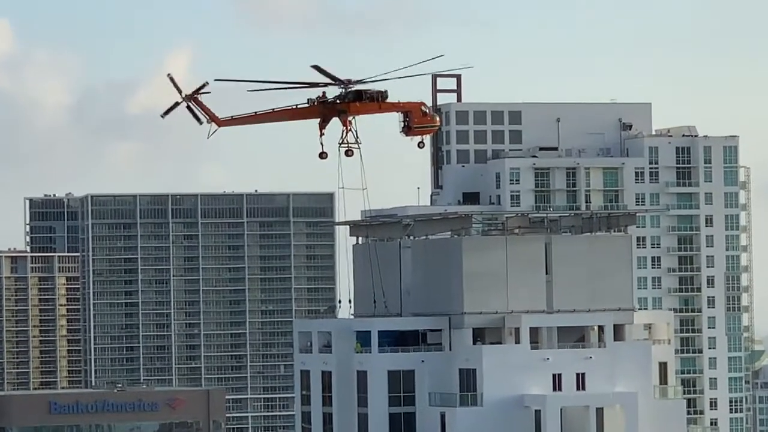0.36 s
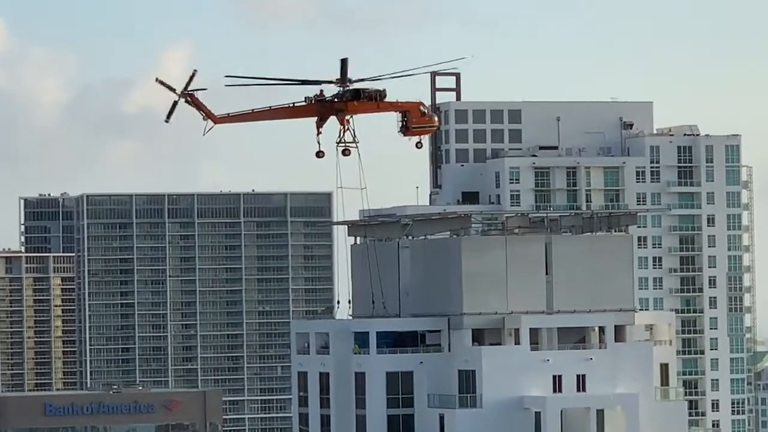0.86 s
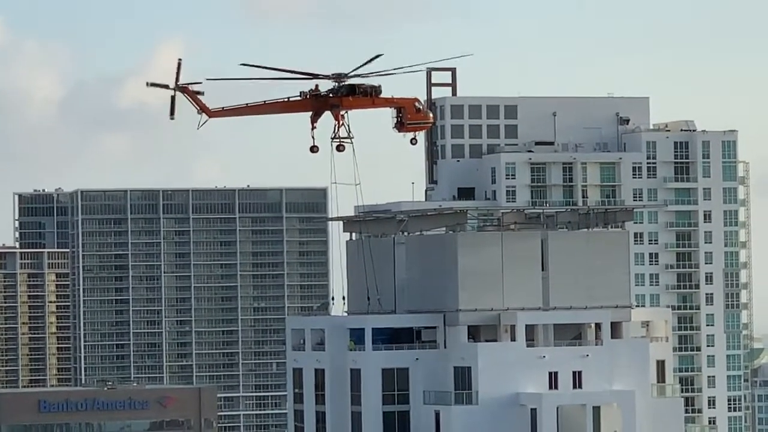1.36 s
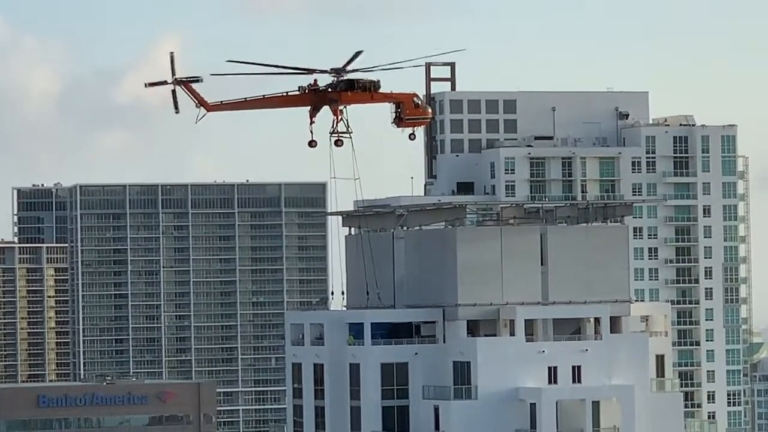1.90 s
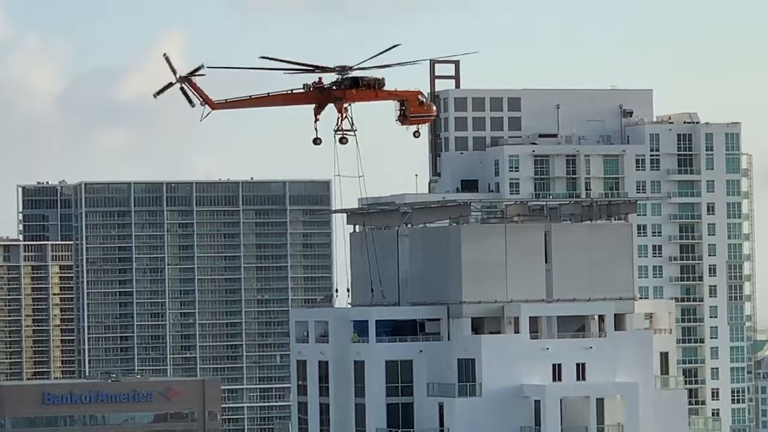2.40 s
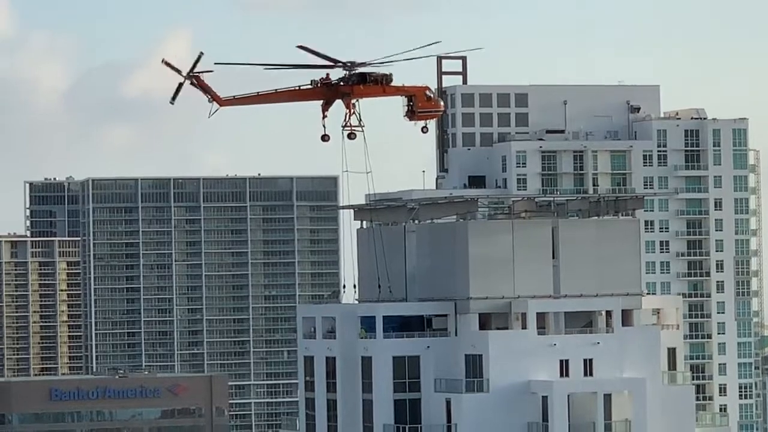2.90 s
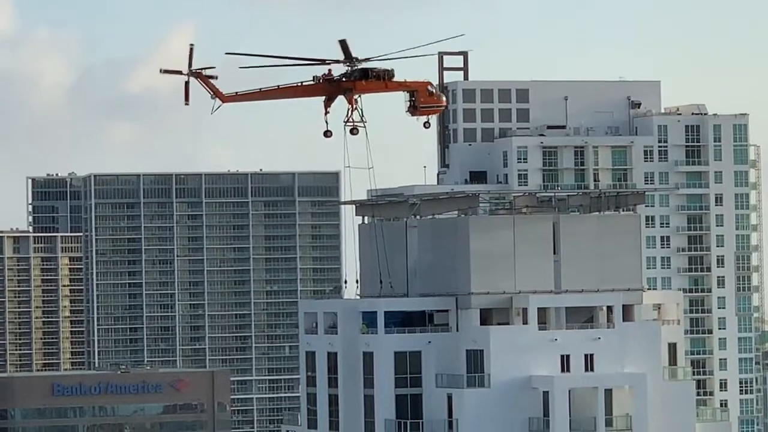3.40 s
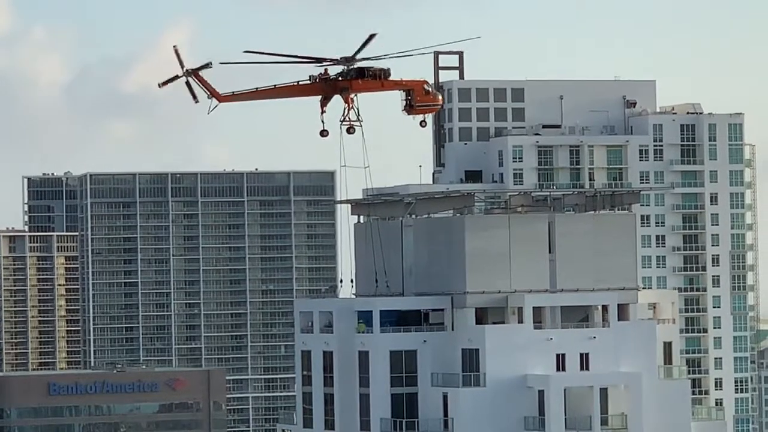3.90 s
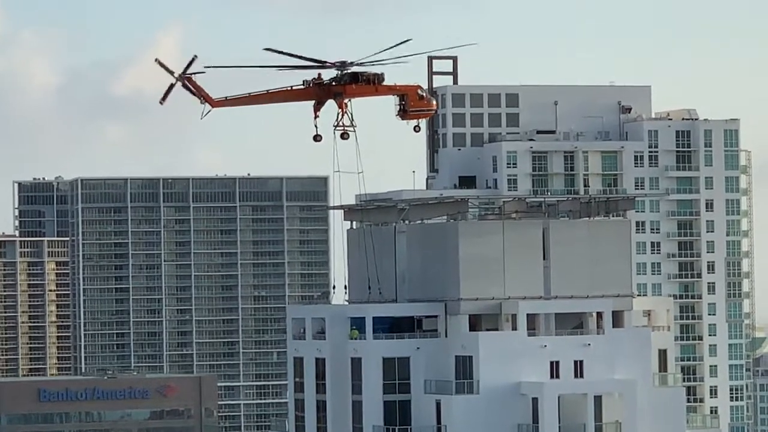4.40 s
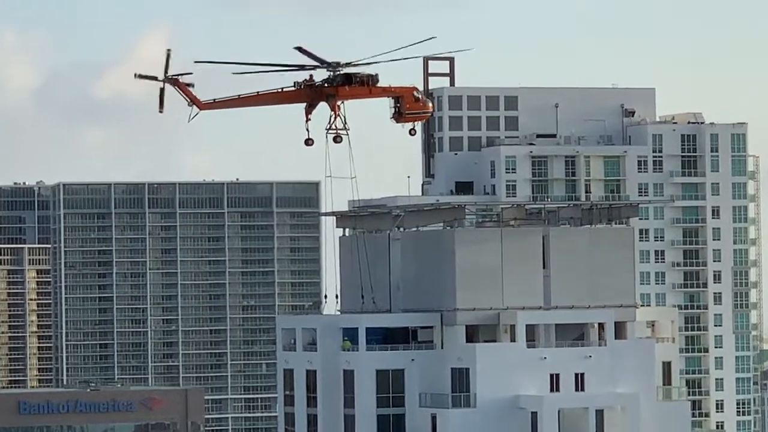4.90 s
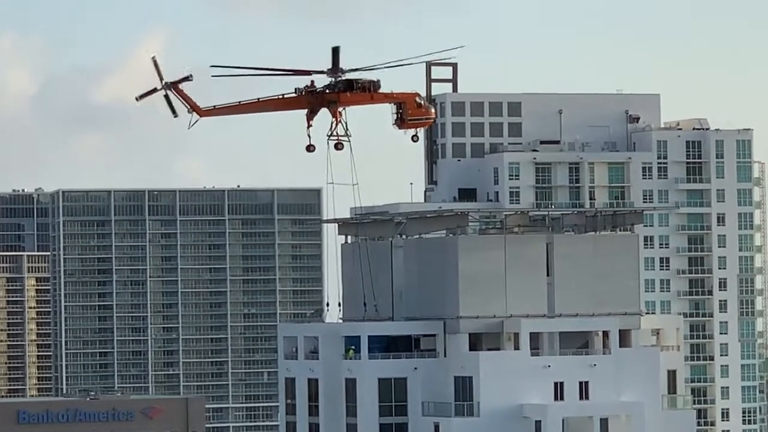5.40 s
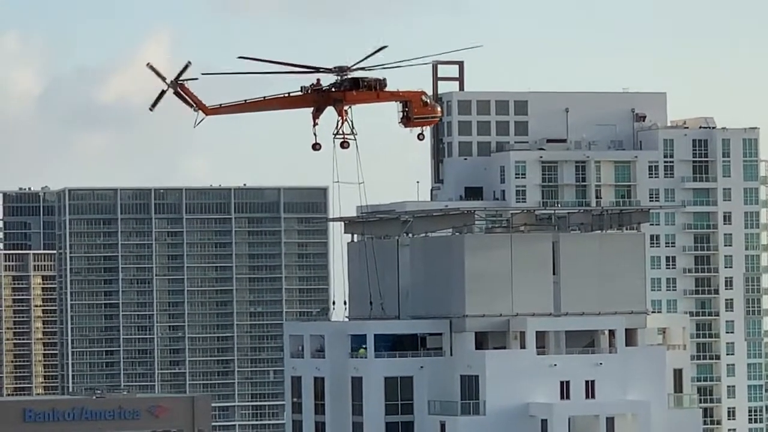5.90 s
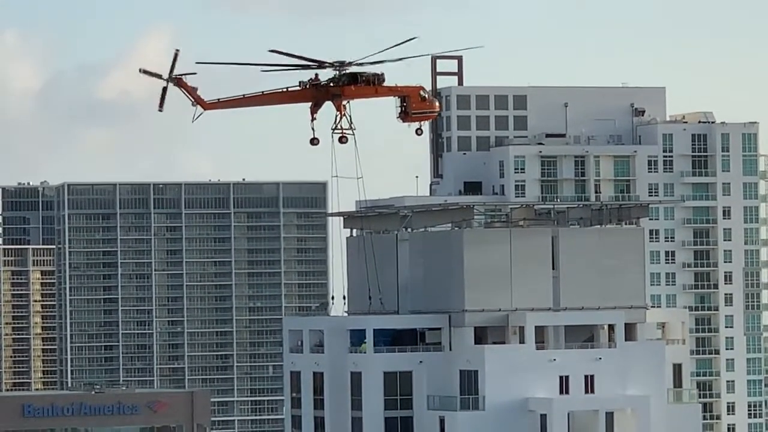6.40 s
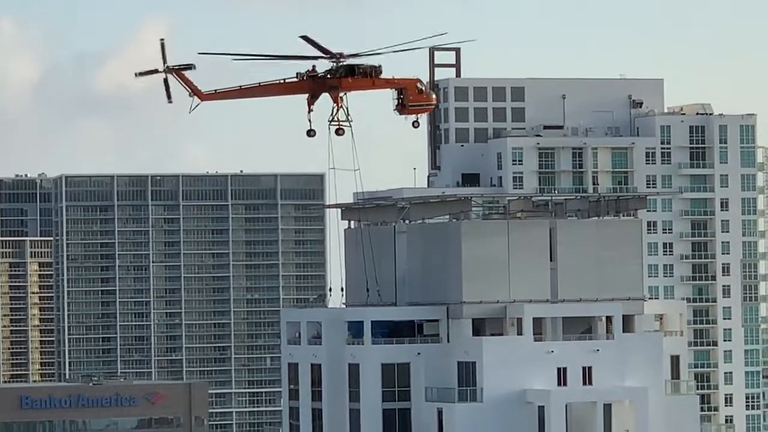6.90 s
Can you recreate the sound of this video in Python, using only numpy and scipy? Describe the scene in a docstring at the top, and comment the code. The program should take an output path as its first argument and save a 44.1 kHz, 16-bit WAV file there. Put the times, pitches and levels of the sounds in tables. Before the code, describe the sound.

Continuous deep rotor roar and rapid blade slaps from a big hovering helicopter, sharper cracks early on, thin wavering engine whine above.

```python
"""Heavy helicopter from a city balcony

It hovers a few hundred metres off over the roofs; two close microphones, a wall behind them returning treble.
Each main blade pass, about 18 a second, pushes a low ring and sheds eddies that hiss; tips slap, dull and bright.
Shaped noise makes the broad rotor wash and turbine exhaust, swelling and fluttering in moving air.
Wavering sines give the rotor hum, the singing gearbox and the compressor whine; narrow noise whistles faintly."""
import sys
import numpy as np
from scipy import signal
from scipy.fft import rfft, irfft
from scipy.io import wavfile
from scipy.ndimage import uniform_filter1d, minimum_filter1d

SR = 44100
rng = np.random.default_rng(int(sys.argv[2]) if len(sys.argv) > 2 else 0)


def generate_wav(sig):
    """Save sig (samples, or channels by samples) to the path in sys.argv[1] as 16-bit PCM at SR."""
    pcm = np.round(np.clip(np.atleast_2d(sig).T, -1, 1) * 32767).astype(np.int16)
    wavfile.write(sys.argv[1], SR, pcm)


def gain_from_decibels(decibels):
    """Convert decibel values to linear amplitude factors."""
    exponent = np.asarray(decibels, float) / 20
    return 10 ** exponent


N = 309582
TIME = np.arange(N) / SR
HZ = np.maximum(np.arange(N // 2 + 1) * SR / N, 1)
BLADE_HZ = 18.536   # main blade passes a second, before the slip

# how clearly the air carries the upper range, and how hard the tips hiss in the wake ahead:
# t/s, clearness/dB, hiss level/dB
UPPER_RANGE = [(0, 4, -30.5), (.45, 2, -30.5), (.7, 2, -30.5), (.9, 0.5, -23.5), (1.1, 4.5, -25.5),
               (1.3, 2.5, -29.5), (1.65, 1, -26.5), (1.95, 3, -35.5), (2.35, 3, -25), (2.6, 2, -29.5),
               (2.95, 2.5, -33), (3.4, -0.5, -28), (3.8, -1.5, -34.5), (4.3, -0.5, -29.5),
               (4.9, -1.5, -38.5), (5.3, -1, -47.5), (6.1, 2, -42), (6.5, 2, -43), (7.02, -0.5, -31)]
# low ring of the blade passes: t/s, slow thump level/dB, quick beat level/dB
LOW_RING = [(0, -17, -20), (.3, -17, -22.5), (1.0, -22.5, -23), (1.3, -18.5, -20), (1.6, -15, -24.5),
            (1.8, -18, -21.5), (2.0, -29.5, -23.5), (2.15, -15.5, -23), (2.4, -17.5, -20.5),
            (2.9, -16.5, -25), (3.3, -25.5, -21.5), (3.65, -27, -27.5), (4.3, -15, -23), (4.75, -25, -26),
            (5.2, -21.5, -31), (5.9, -29.5, -22.5), (6.6, -36, -23.5), (7.02, -33.5, -22)]


def rms_one(x):
    """Scale to rms 1."""
    return x / np.sqrt(np.mean(x ** 2) + 1e-20)


def in_time(rows):
    """Columns of a time table, one value a sample."""
    s, *columns = np.transpose(rows)
    return [np.interp(TIME, s, column) for column in columns]


def at_hz(points, hz):
    """Read a spectrum on a log-frequency axis."""
    point_hz, value = np.transpose(points)
    return np.interp(np.log(hz), np.log(point_hz), value)


def drift(rate_hz):
    """Slow chance with spread 1: noise through two equal poles, drawn every 40 samples."""
    r = np.exp(-80 * np.pi * rate_hz / SR)
    noise = rng.standard_normal(N // 40 + 2002)
    slow = signal.lfilter([1], [1, -2 * r, r * r], noise)[2000:]
    return np.interp(np.arange(N) / 40, np.arange(len(slow)), rms_one(slow - slow.mean()))


def colour(x, spectrum):
    """Give x a spectrum; rms 1."""
    return rms_one(irfft(rfft(x) * gain_from_decibels(at_hz(spectrum, HZ)), N))


def resonance(x, hz, width_hz):
    """Two-pole resonance with gain 1 on top."""
    r = np.exp(-np.pi * width_hz / SR)
    poles = [1, -2 * r * np.cos(2 * np.pi * hz / SR), r * r]
    return signal.lfilter([(1 - r * r) / 2, 0, (r * r - 1) / 2], poles, x + 1e-18)


def twice_resonant(x, hz, width_hz):
    """The same resonance applied twice, so that a ring swells and dies."""
    return resonance(resonance(x, hz, width_hz), hz, width_hz)


def spike_band(x, edges_hz):
    """Band-pass scaled so that a unit spike keeps a peak of 1."""
    sos = signal.butter(4, edges_hz, "band", fs=SR, output="sos")
    peak = np.abs(signal.sosfilt(sos, signal.unit_impulse(500))).max()
    return signal.sosfilt(sos, x) / peak


def bursts(at, level_db, width_s):
    """A bell-shaped envelope at each sample index."""
    marks = np.zeros(N)
    marks[at] = gain_from_decibels(level_db)
    bell = np.exp(-.5 * (np.linspace(-.03, .03, 2647) / width_s) ** 2)
    return signal.fftconvolve(marks, bell, "same")


def rotor_turns():
    """Blade passes counted up to each sample; the rotor speed wanders, so they slip against an even beat."""
    # t/s, share of a pass late
    slip = [(0, .54), (.5, .6), (.75, .68), (1.0, .73), (2.0, .77), (3.5, .81), (4.4, .765), (5.5, .75),
            (6.2, .72), (7.02, .77)]
    return BLADE_HZ * TIME - in_time(slip)[0]


def pass_samples(jitter_s):
    """Sample index of each blade pass, scattered by chance."""
    passes = int(N / SR * BLADE_HZ)
    at = np.interp(np.arange(passes), rotor_turns(), np.arange(N))
    at = at + jitter_s * SR * rng.standard_normal(passes)
    return np.clip(at.astype(int), 0, N - 1)


def roar(patchy_db, surge_db, flutter_db, throb_db):
    """Wash and exhaust noise; moving air makes each half octave swell and flutter."""
    # spectra of rotor wash and turbine exhaust: f/Hz, relative level/dB per Hz
    wash = [(11, -40.5), (18, -36), (43, -10.5), (140, -9.5), (193, -1), (292, -8), (368, -7), (485, -16),
            (591, -15.5), (669, -27.5), (700, -23.5), (910, -55), (1540, -120)]
    exhaust = [(380, -33.5), (650, -0.5), (730, 0.5), (1280, -8), (1390, -7.5), (1900, -9.5), (2160, -16.5),
               (2570, -14.5), (3300, -17.5), (4350, -21.5), (4650, -25.5), (5050, -20), (5380, -29.5),
               (5560, -21.5), (6100, -25), (7020, -31.5), (8360, -35), (9850, -39.5), (10600, -53.5),
               (13700, -80), (22000, -120)]
    # centres of rumble, drone, body, middle and treble: f/Hz
    air_hz = [70, 195, 350, 1000, 3500]
    # swell of the lowest wash: t/s, level/dB
    rumble = [(0, 0.5), (.8, -1), (2, -1.5), (3.4, -2.5), (4.2, -1), (5, -0.5), (5.7, 0.5), (6.3, 3),
              (7.02, 4)]
    both = 0
    for spectrum, level_db in [(wash, -16), (exhaust, -27.5)]:   # rms before the swells
        shape_db = at_hz(spectrum, HZ)
        white = rfft(rng.standard_normal((2, N)))
        both = both + gain_from_decibels(level_db) * white * gain_from_decibels(shape_db) / np.sqrt(np.mean(gain_from_decibels(2 * shape_db)))

    thump_db, beat_db = in_time(LOW_RING)
    clear_db = in_time(UPPER_RANGE)[0]
    # drone, body and middle follow thump, beat and clearness in part
    swell = np.array([in_time(rumble)[0], 0.071 * thump_db, 0.045 * beat_db, 0.68 * clear_db, clear_db])
    swell -= swell.mean(axis=1, keepdims=True)
    throb = np.cos(2 * np.pi * (rotor_turns() - .12))   # the wash rises just behind each blade
    together = drift(3.2)
    out = 0
    for octave in np.arange(4, 14, .5):   # log2 of the centre in Hz
        band = np.cos(np.pi * np.clip(np.log2(HZ) - octave, -.5, .5)) ** 2
        shares = [np.interp(octave, np.log2(air_hz), column) for column in np.eye(len(swell))]
        gain_db = shares @ swell
        gain_db += throb_db * throb * np.clip(octave - 6, 0, 1)   # none up to 64 Hz, full from 128 Hz
        gain_db += patchy_db * drift(0.39) + surge_db * drift(5.0)
        gain_db += flutter_db * (0.12 * together + drift(31))
        out = out + gain_from_decibels(gain_db) * irfft(both * band, N)
    return out


def tone(hz, level_db, waver_hz, clean):
    """A sine whose strength and phase waver about a steady part as the air scatters it."""
    turn = np.exp(2j * np.pi * (np.cumsum(hz + 0 * TIME) / SR + rng.random()))
    rows = [turn * (clean + drift(waver_hz) + 1j * drift(waver_hz)) for arrival in range(2)]
    return gain_from_decibels(level_db) * rms_one(np.real(rows))


def rotor_hum():
    """Low tones of the main and tail rotors, each a slowly wavering sine."""
    # f/Hz, level/dB
    hum = [(18.52, -60.5), (37.04, -60), (56.55, -38), (113.2, -36), (169.8, -31.5), (226.3, -46),
           (283, -35.5)]
    return sum(tone(hz, db, waver_hz=.7, clean=3.0) for hz, db in hum)


def compressor_whine():
    """The compressor's gliding sine flickers and throbs with the blades."""
    # pitch: t/s, f/Hz
    pitch = [(0, 5640), (.5, 5670), (.9, 5705), (1.5, 5725), (2.3, 5752), (4.3, 5742), (6.1, 5715),
             (7.02, 5725)]
    # level before flicker and throb: t/s, level/dB
    whine_level = [(0, -39.5), (.1, -55), (.35, -43), (.55, -56), (.7, -53), (.85, -43.5), (1.0, -57),
                   (1.1, -42), (1.17, -49), (1.25, -42.5), (1.45, -46.5), (1.7, -49.5), (2.0, -47),
                   (2.3, -44), (2.7, -45.5), (3.1, -45), (3.5, -51), (3.75, -47), (4.0, -45.5),
                   (4.15, -39.5), (4.3, -47), (4.43, -40.5), (4.6, -50.5), (5.0, -45.5), (5.45, -44),
                   (5.9, -52), (6.15, -42.5), (6.3, -43), (6.55, -42), (6.8, -48), (7.02, -44)]
    whine = tone(in_time(pitch)[0], in_time(whine_level)[0], waver_hz=28, clean=1.2)
    flicker_db = 1.5 * drift(11)
    throb_db = 1.5 * np.cos(2 * np.pi * rotor_turns())
    return whine * gain_from_decibels(flicker_db + throb_db)


def gear_mesh():
    """Meshing teeth sing a slowly gliding sine and its third harmonic."""
    # pitch at the start and at the end: f/Hz
    glide = [1352, 1358.5]
    # level of the fundamental: t/s, level/dB
    gear_level = [(.4, -48), (.6, -32.5), (1.0, -36.5), (1.45, -33), (1.6, -44), (2.0, -50), (2.3, -38),
                  (2.7, -37), (3.1, -41.5), (3.4, -57), (4.5, -42.5), (5.2, -39), (5.5, -44.5), (6.4, -41),
                  (6.8, -50), (7.02, -40)]
    gear_hz = np.linspace(*glide, N)
    third_db = -55 + 0.87 * in_time(UPPER_RANGE)[0]   # rises with the clearness
    low = tone(gear_hz, in_time(gear_level)[0], waver_hz=2.9, clean=1.7)
    return low + tone(3 * gear_hz, third_db, waver_hz=12, clean=0.45)


def engine_whistles():
    """Weaker engine whistles: narrow bands of noise that drift in level."""
    # f/Hz, width/Hz of each of two resonances, level/dB before the drift
    faint = [(5470, 58, -61.5), (5800, 300, -55), (6470, 60, -65), (6040, 250, -61.5), (8200, 40, -71.5),
             (718, 55, -41.5), (1917, 89, -43.5), (4200, 300, -51)]
    out = 0
    for hz, width_hz, db in faint:
        whistle = rms_one(twice_resonant(rng.standard_normal((2, N)), hz, width_hz))
        out = out + gain_from_decibels(db + 2.7 * drift(3.0)) * whistle
    return out


def bright_edges(scatter_s):
    """Bright edges of the blade-tip slaps, most heard together with a dull crack; a small tick near every pass."""
    # strong edges: t/s, peak level/dB
    strong = [(0.166, -15), (0.2173, -19), (0.3785, -22), (0.4824, -11.5), (0.6406, -25.5), (0.6963, -22.5),
              (0.7383, -19), (0.846, -19), (0.9027, -13.5), (0.9542, -16), (1.0625, -12.5), (1.114, -19.5),
              (2.136, -19.5), (2.2004, -16), (2.2513, -14), (2.3075, -13.5), (2.4147, -11.5), (2.522, -22),
              (2.7387, -18), (2.8689, -18), (3.1667, -26), (3.2246, -18.5), (3.3858, -18), (3.4331, -24),
              (3.495, -16.5), (3.5453, -17.5), (3.6057, -17), (3.6476, -20.5), (3.7056, -28),
              (3.8187, -18.5), (3.845, -15), (3.9513, -18), (4, -33), (4.272, -18), (4.353, -17),
              (4.4017, -24), (4.4628, -20)]
    # lower and upper edge of the band: f/Hz
    band_hz = [1310, 4800]
    spikes = np.zeros(N)
    at = pass_samples(scatter_s)
    tick_db = -1 + 4 * rng.standard_normal(len(at))   # peak against the hiss level
    spikes[at] = gain_from_decibels(in_time(UPPER_RANGE)[1][at] + tick_db)
    s, peak_db = np.transpose(strong)
    spikes[(s * SR).astype(int)] = gain_from_decibels(peak_db)
    after = ((s + rng.uniform(.0005, 0.0035, len(s))) * SR).astype(int)
    spikes[after] = -gain_from_decibels(peak_db - 5.5)   # a weaker second spike follows each strong one, turned over
    heard = spike_band(spikes, band_hz)
    return np.array([heard, 0.12 * np.roll(heard, 40)])


def cracks(spacing_s, fade_db):
    """A tip cuts a vortex: a ragged run of five dull pressure spikes, the second the hardest."""
    # sharpest blade slaps: t/s, level/dB of the hardest spike before the band-pass
    slaps = [(0.25, -11.5), (0.3, -17.5), (0.317, -19), (0.353, -8), (0.378, -11), (0.458, -15),
             (0.481, -15.5), (0.519, -9), (0.534, -11), (0.626, -13), (0.636, -4.5), (0.672, -10.5),
             (0.695, -9), (0.741, -6.5), (0.788, -12.5), (0.847, -8), (0.902, -0.5), (0.954, -7),
             (1.009, -9), (1.063, -18), (1.112, -6.5), (1.168, -11.5), (1.219, -10.5), (1.271, -8),
             (1.333, -10), (1.386, -13.5), (1.434, -21), (1.489, -20), (1.551, -18), (1.603, -15),
             (1.657, -12), (1.709, -12.5), (1.865, -22), (2.09, -16.5), (2.198, -14.5), (2.25, -25.5),
             (2.307, -5.5), (2.358, -19), (2.415, -5.5), (2.457, -13), (2.525, -7.5), (2.57, -11),
             (2.738, -10), (2.778, -17.5), (2.895, -13), (3.168, -11.5), (3.222, -13.5), (3.279, -15),
             (3.388, -16.5), (3.432, -21), (3.494, -12), (3.544, -14), (3.708, -15), (3.809, -12),
             (3.919, -13.5), (4.03, -17), (4.088, -16.5), (4.14, -10), (4.188, -18), (4.244, -20),
             (4.297, -11), (4.355, -12), (4.403, -17), (4.463, -12), (4.572, -22), (4.618, -14.5),
             (5.233, -29), (5.482, -15), (5.679, -23.5), (5.967, -19.5), (6.72, -17)]
    body = np.zeros(N)
    chance = rng.random((len(slaps), 3, 5))
    for (s, peak_db), (gap, size, sign) in zip(slaps, chance):
        late_s = spacing_s * (np.cumsum(.3 + gap) - .8 - gap[0])
        at = ((s + late_s) * SR).astype(int)
        level_db = peak_db - fade_db * np.abs(np.arange(5) - 1) * (0.1 + size)
        body[at] += gain_from_decibels(level_db) * np.sign(sign - .5)
    body = spike_band(body, [450, 1900])
    return np.array([body, 0.067 * np.roll(body, 40)])


def ringing(drive, modes, shift):
    """Twice-applied resonances of alternating sign, moved in pitch by shift and widened 1.66 times."""
    out = 0
    for k, (hz, width_hz, db) in enumerate(modes):
        out = out + gain_from_decibels(db) * (-1) ** k * twice_resonant(drive, shift * hz, 1.66 * width_hz)
    return out


def pass_ring(at, spread_db, gust_s):
    """Each pass pushes the air, which rings low at a pitch that shifts from pass to pass."""
    # slow thump and quick beat: f/Hz before the shift, width/Hz before widening, relative level/dB
    thump_modes = [(107, 41, -16), (193, 22, 4)]
    beat_modes = [(355.8, 53, 10.5), (504, 340, -11)]
    beat_early_s, thump_late_s = .004, .002   # against the first hiss
    level_db = spread_db * rng.standard_normal(len(at))
    dealt = rng.integers(0, 5, len(at))
    thump, beat = 0, 0
    for k, shift in enumerate(np.linspace(.9, 1.1, 5)):
        mine = np.maximum(at[dealt == k] - int(beat_early_s * SR), 0)
        push = np.zeros(N)
        push[mine] = gain_from_decibels(level_db[dealt == k])
        gust = rng.standard_normal((2, N)) * bursts(mine, level_db[dealt == k], gust_s)
        # the push repeats in form, the gust makes every pass ring differently
        drive = rms_one(gust) + np.array([[1.5], [.2]]) * rms_one(push)
        thump = thump + ringing(drive, thump_modes, shift ** .25)
        beat = beat + ringing(drive, beat_modes, shift)
    late = int((thump_late_s + beat_early_s) * SR)
    thump = np.pad(thump, [(0, 0), (late, 0)])[:, :N]
    thump_db, beat_db = in_time(LOW_RING)
    return gain_from_decibels(thump_db) * rms_one(thump) + gain_from_decibels(beat_db) * rms_one(beat)


def eddies(gate, per_s, cycles):
    """Vortices leave the blade at random, each a short ring at its own pitch."""
    # f/Hz, relative gain/dB
    swish_colour = [(300, 6.5), (600, -7.5), (900, 8.5), (1700, -1.5), (2100, -13), (4000, -21),
                    (5200, -32), (7000, -40), (10500, -60)]
    sizes = rng.standard_normal((2, N)) * (rng.random((2, N)) < per_s / SR) * gate
    pitches, dealt = np.geomspace(400, 9000, 14), rng.integers(0, 14, N)
    rings = sum(resonance(sizes * (dealt == k), hz, hz / cycles) for k, hz in enumerate(pitches))
    return colour(rings, swish_colour)


def tip_hiss(at, swish_s):
    """Each pass sheds a burst of eddies, and a second crackle trails it."""
    # the trailing crackle: t/s, level/dB against the first
    trail = [(0, -8.5), (.3, 5), (.7, 1.5), (.9, -5), (2, -11.5), (3.6, -23), (3.9, -11.5), (4.4, -13),
             (5, 6), (7.02, -8)]
    # extra treble above about 2.2 kHz, before its drift: t/s, gain/dB
    bright = [(0, 0), (.6, 5), (.9, 9), (1.15, 1.5), (1.4, -8), (2.0, -2), (2.3, 5.5), (2.45, 9.5),
              (2.65, 1), (3.3, 6.5), (3.7, 9), (4.0, -7.5), (4.3, 1), (7.02, 8)]
    late_s = .02 + 0.0055 * rng.standard_normal(len(at))
    after = np.minimum(at + (late_s * SR).astype(int), N - 1)
    first_db = 2.6 * rng.standard_normal(len(at))
    trail_db = in_time(trail)[0][at] + 1.7 * rng.standard_normal(len(at))
    gate = bursts(at, first_db, swish_s) + bursts(after, trail_db, swish_s)
    swish = eddies(gate, per_s=4000, cycles=5.1)
    treble = irfft(rfft(swish) / (1 + (2200 / HZ) ** 12), N)
    swish += (gain_from_decibels(in_time(bright)[0] + 3 * drift(12)) - 1) * treble
    return gain_from_decibels(in_time(UPPER_RANGE)[1]) * swish


def blades(jitter_s, spread_db, gust_s, swish_s):
    """Each main blade pass: a push that rings low, and bursts of turbulent hiss."""
    at = pass_samples(jitter_s)
    return pass_ring(at, spread_db, gust_s) + tip_hiss(at, swish_s)


def balcony(steady, tips):
    """Two microphones share the direct sound with a phase lead and hear the scattered sound apart; walls echo."""
    # f/Hz, left-right likeness (0 to 1)
    likeness = [(40, 0.83), (110, 0.94), (190, 0.95), (330, 0.93), (590, 0.83), (1040, 0.9), (1830, 0.57),
                (3240, 0.49), (4500, 0.59), (5380, 0.33), (5560, 0.34), (5700, 0.16), (6400, 0.54),
                (7200, 0.78), (8200, .25), (10100, 0.32)]
    # f/Hz, lead of the left/rad
    lead = [(20, .01), (350, .12), (600, -.1), (1500, -.41), (2150, -1.2), (2600, .1), (3000, -.4),
            (3700, .4), (4400, .99), (5400, 3.1), (6300, .3), (7200, 2.8), (9000, 0), (10500, -.6)]
    # f/Hz, left minus right/dB
    lean = [(60, -2), (190, -1.5), (330, -0.3), (590, 0), (1040, 0), (1830, 1.3), (3240, 1), (5000, 1),
            (5720, -4), (7900, 2), (8050, -6.5), (10100, 1)]
    # wall echo, left and right: delay/s; level/dB
    wall_s = [.02268, .02275]
    wall_db = [-11, -12]
    # lower and upper edge of the wall echo: f/Hz
    wall_hz = [2250, 4300]
    direct, scattered = rfft(steady + tips)
    alike = np.clip(at_hz(likeness, HZ), 0, 1)
    side = np.array([[1], [-1]])
    turn = np.exp(.5j * side * at_hz(lead, HZ)) * gain_from_decibels(.5 * side * at_hz(lean, HZ))
    pair = turn * (np.sqrt((1 + alike) / 2) * direct + side * np.sqrt((1 - alike) / 2) * scattered)

    low_cut = 1 + (wall_hz[0] / np.maximum(HZ, 100)) ** 20
    high_cut = 1 + (HZ / wall_hz[1]) ** 10
    facing = rfft(steady[0] + gain_from_decibels(12) * tips[0])   # the tips face the wall and come back 12 dB stronger
    delay = np.exp(-2j * np.pi * HZ * np.c_[wall_s])
    echo = facing / np.sqrt(low_cut * high_cut) * gain_from_decibels(np.c_[wall_db]) * delay
    heard = irfft(pair + echo, N)

    # dull early echo from the balcony floor and ceiling: 8.1 ms, -17 dB, below 2 kHz
    early = np.roll(heard, round(.0081 * SR), axis=1)
    heard += gain_from_decibels(-17) * signal.lfilter(*signal.butter(2, 2000, fs=SR), early)
    return heard - 0.33 * resonance(heard, hz=676, width_hz=91)   # a dip from a surface close by


def scene():
    """All sources as a direct and a scattered arrival, heard on the balcony."""
    steady = roar(patchy_db=0.08, surge_db=1.07, flutter_db=1.5, throb_db=0.46)
    steady = steady + rotor_hum() + compressor_whine() + gear_mesh() + engine_whistles()
    tips = bright_edges(scatter_s=0.0043) + cracks(spacing_s=0.00158, fade_db=13.0)
    tips = tips + blades(jitter_s=0.0011, spread_db=1.23, gust_s=0.0052, swish_s=0.005)
    return balcony(steady, tips)


def low_pass(x):
    """Removes everything above the highest recorded frequency."""
    return signal.sosfilt(signal.butter(12, 10710, fs=SR, output="sos"), x)


def record(dry):
    """A fast limiter turns the level down around each peak above its ceiling."""
    ceiling, hold = .97, 221   # full scale is 1; samples, 5 ms
    room = np.minimum(ceiling / np.maximum(np.abs(dry).max(axis=0), 1e-9), 1)
    gain = uniform_filter1d(minimum_filter1d(room, size=2 * hold), size=hold)
    return low_pass(dry * gain)


dry = scene()
out = record(dry)
generate_wav(out)
```